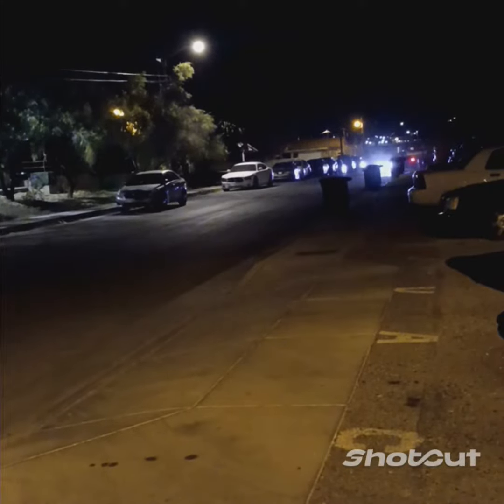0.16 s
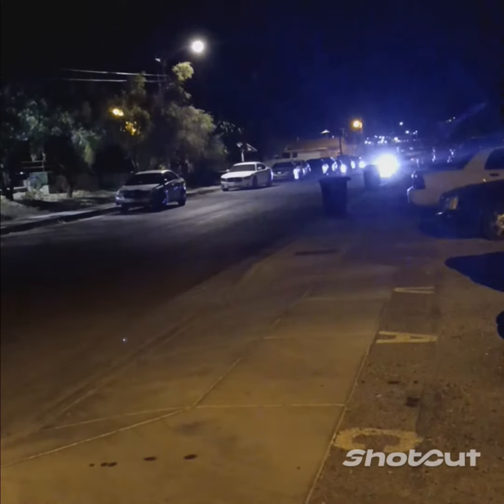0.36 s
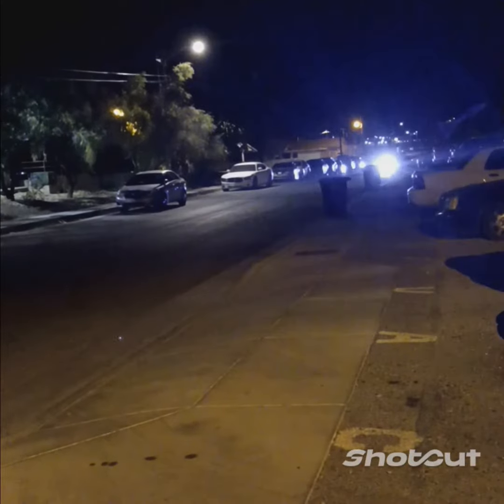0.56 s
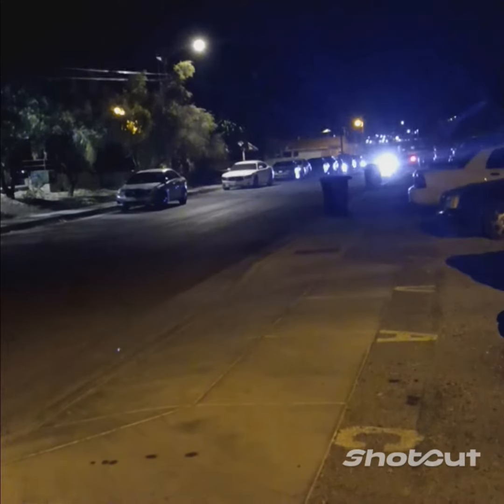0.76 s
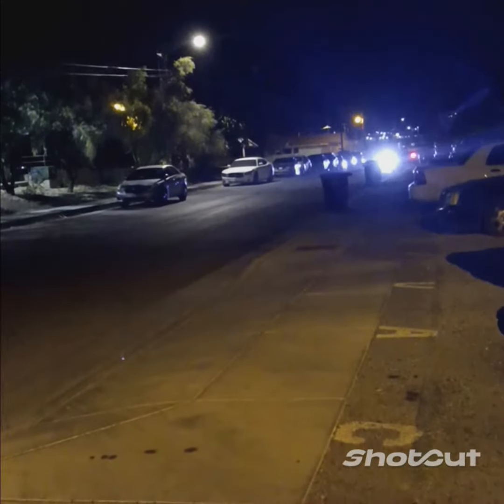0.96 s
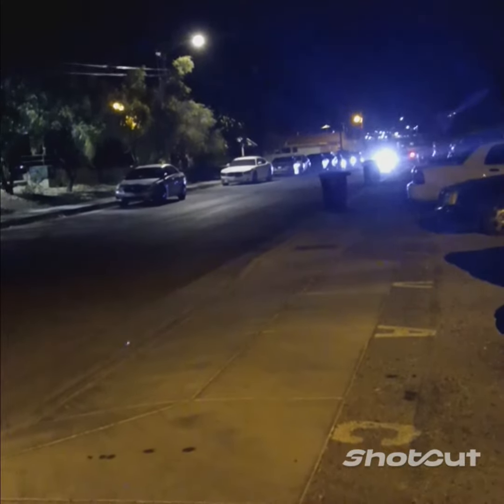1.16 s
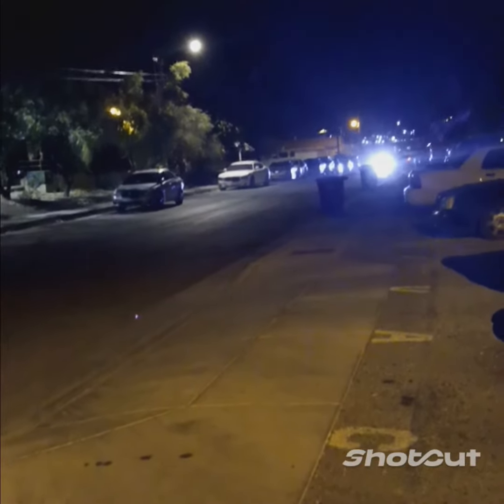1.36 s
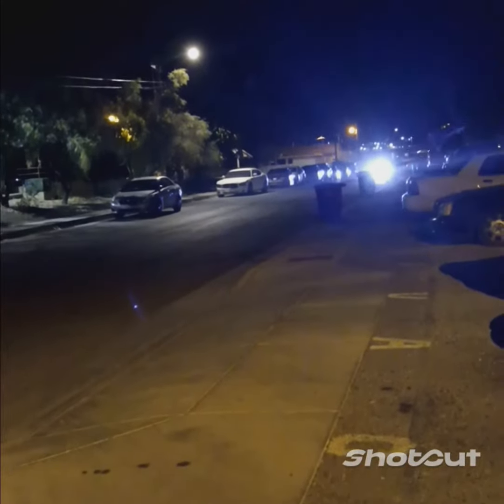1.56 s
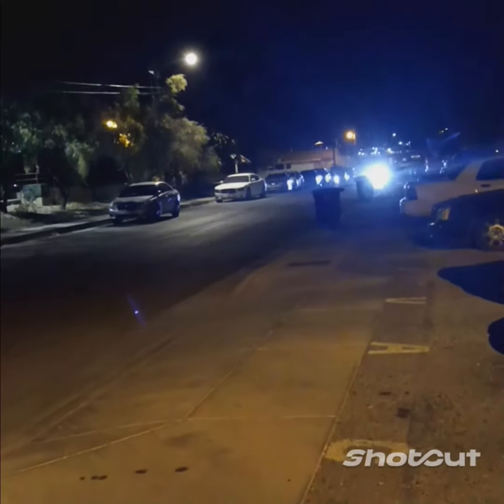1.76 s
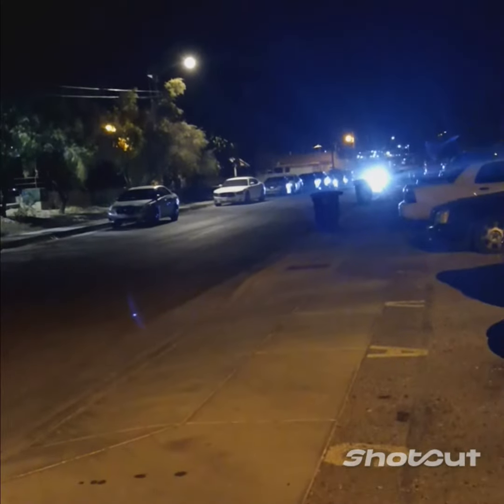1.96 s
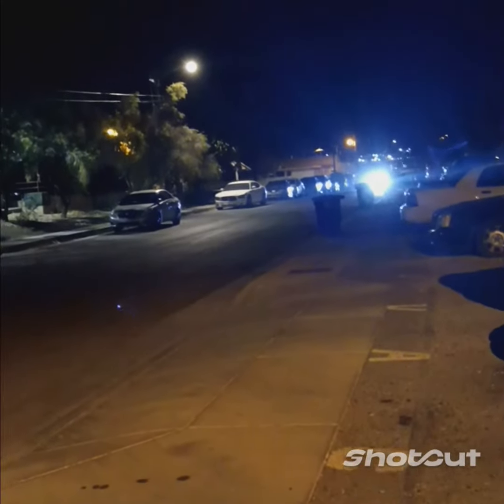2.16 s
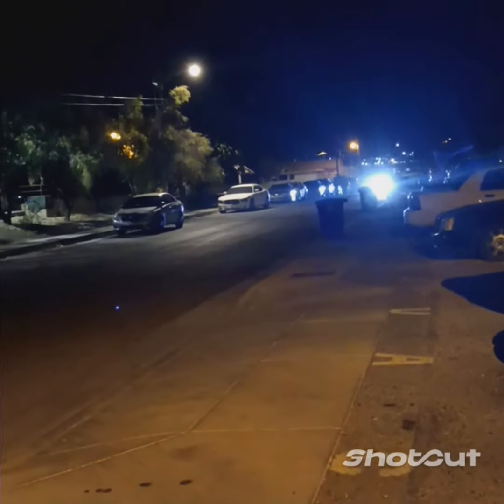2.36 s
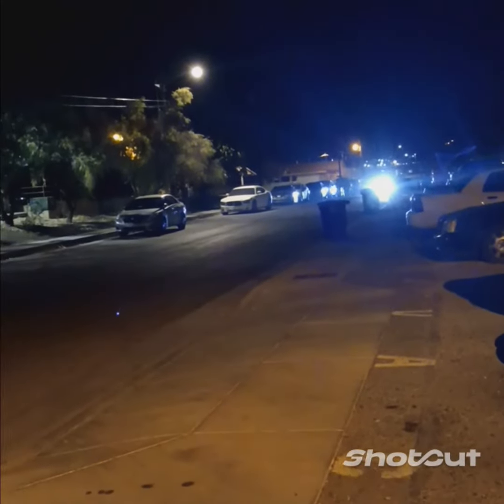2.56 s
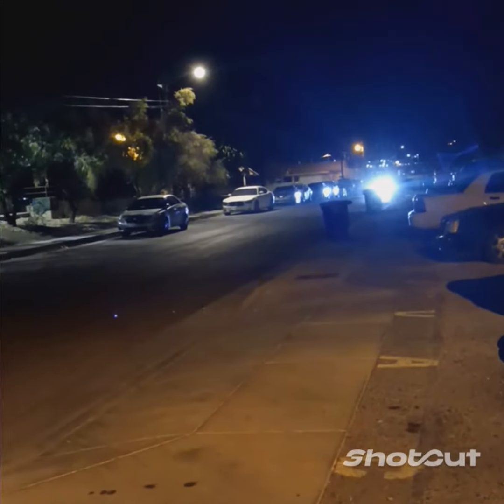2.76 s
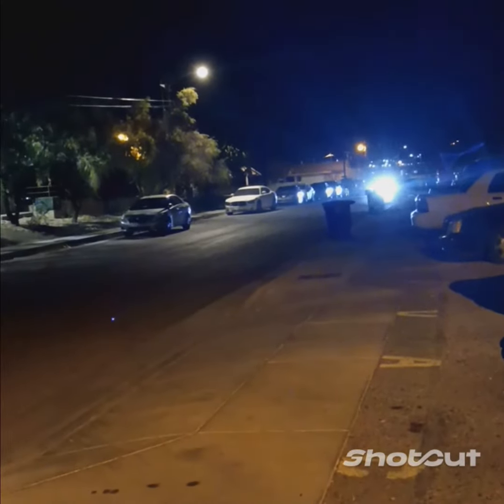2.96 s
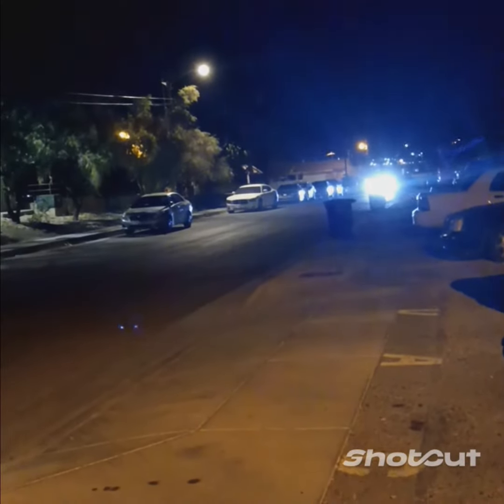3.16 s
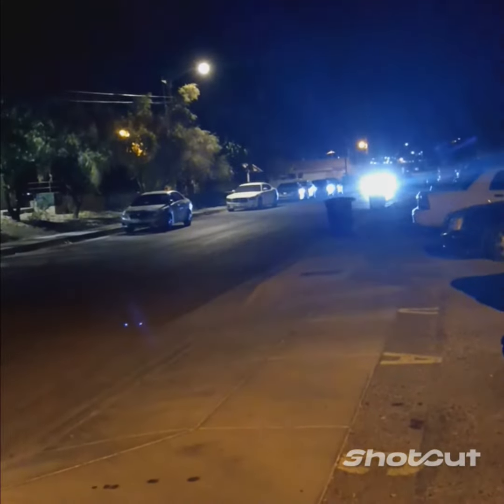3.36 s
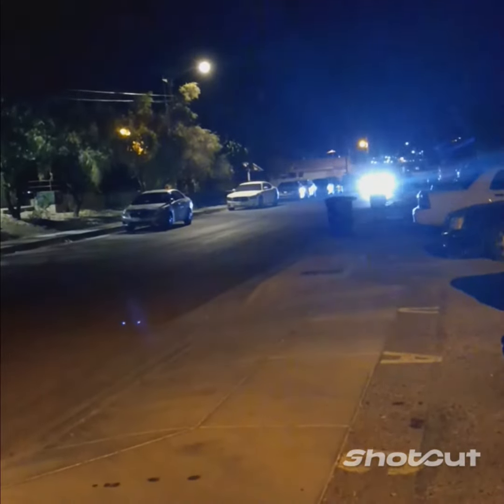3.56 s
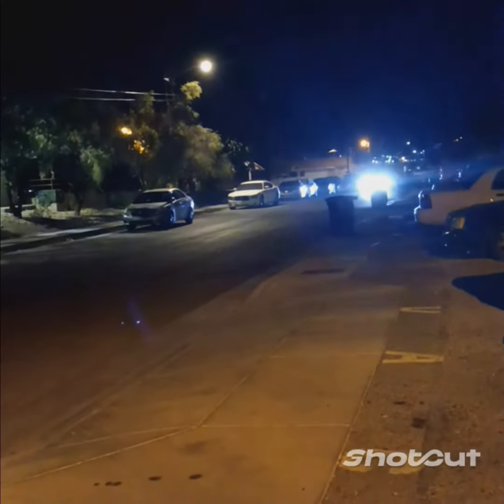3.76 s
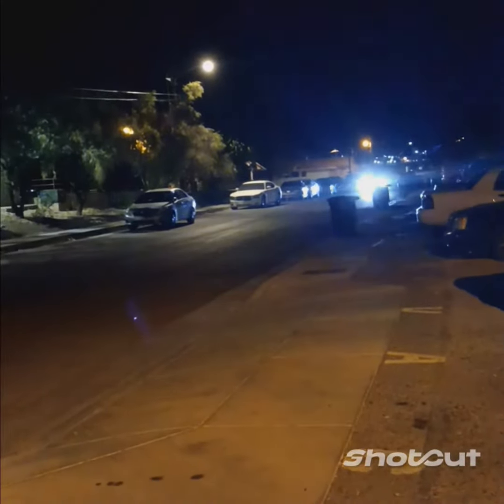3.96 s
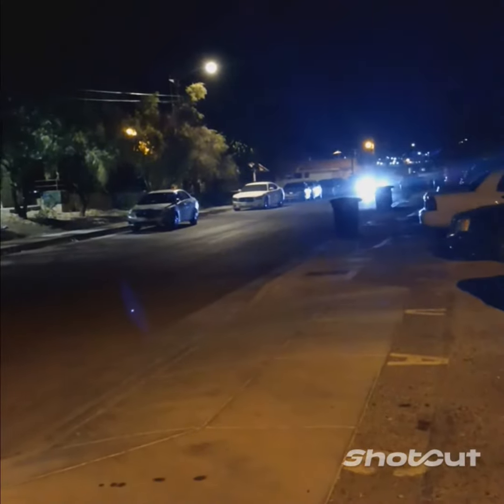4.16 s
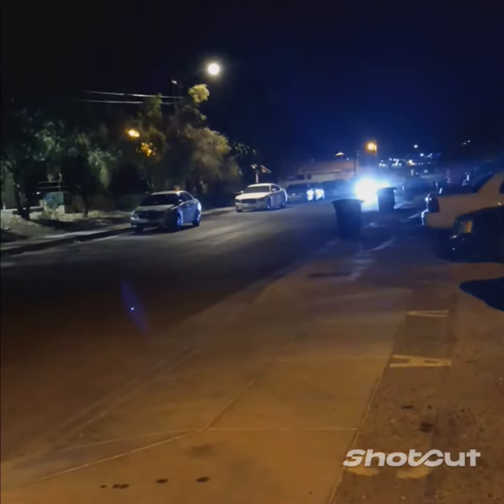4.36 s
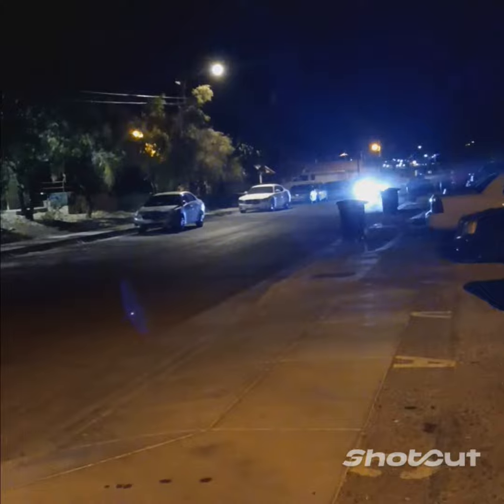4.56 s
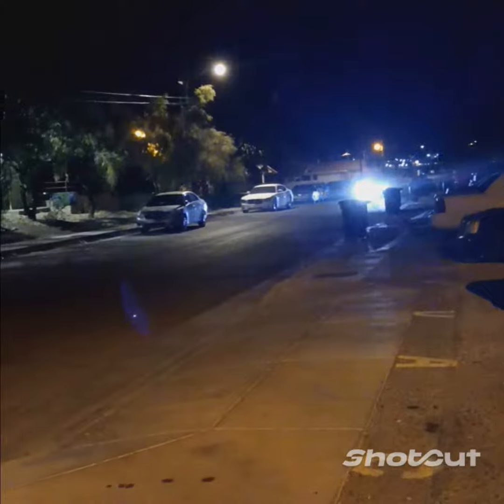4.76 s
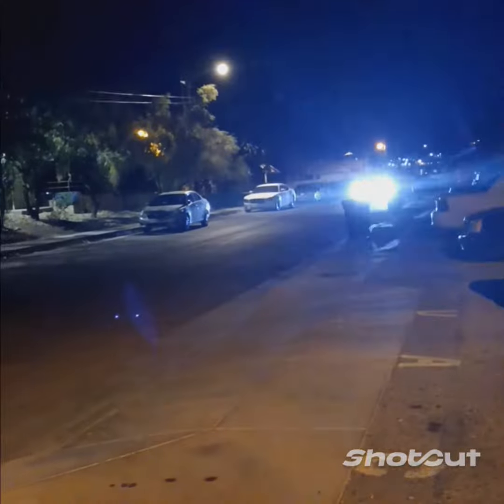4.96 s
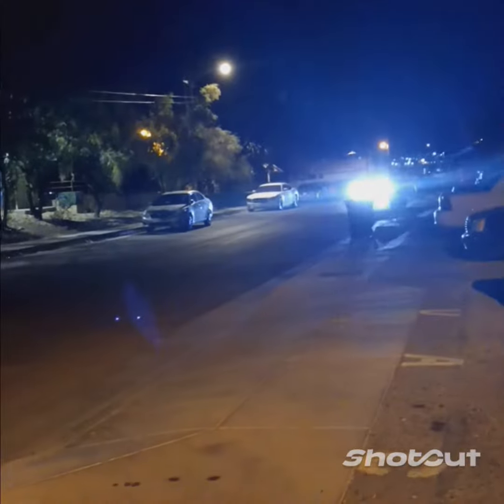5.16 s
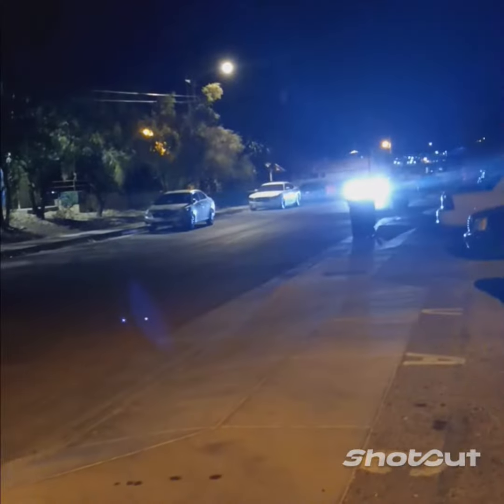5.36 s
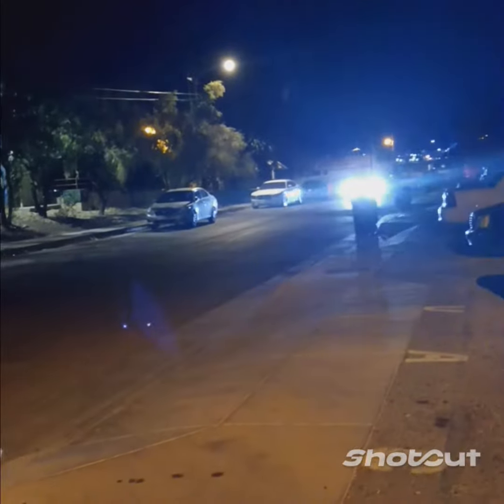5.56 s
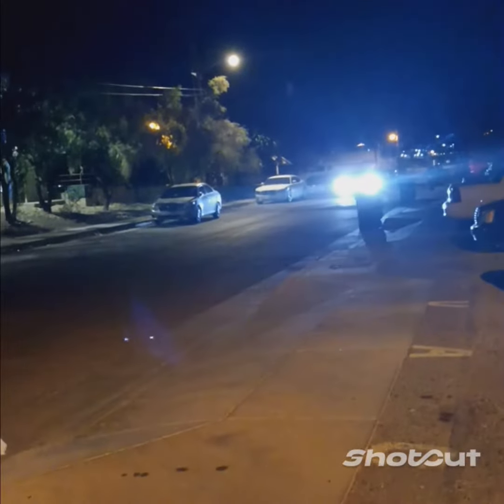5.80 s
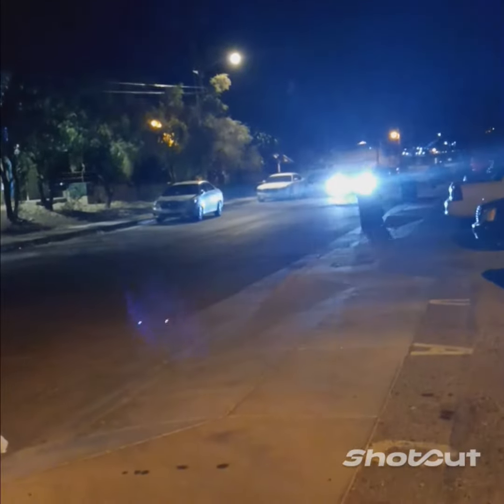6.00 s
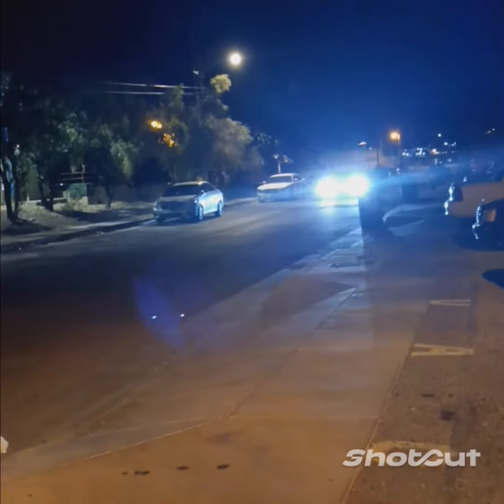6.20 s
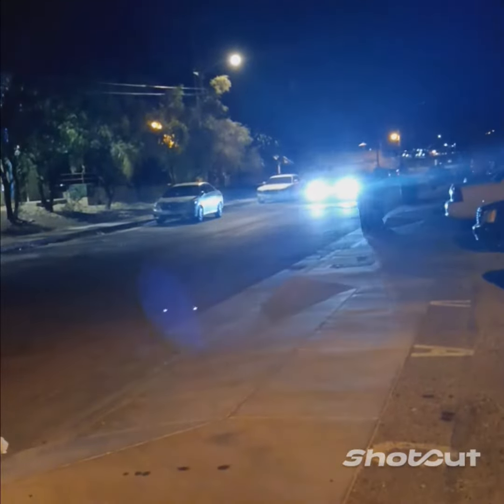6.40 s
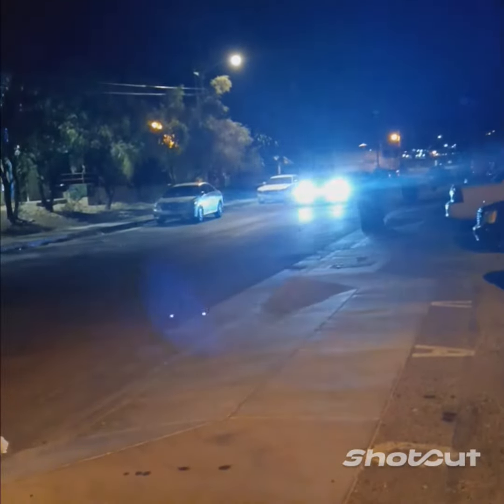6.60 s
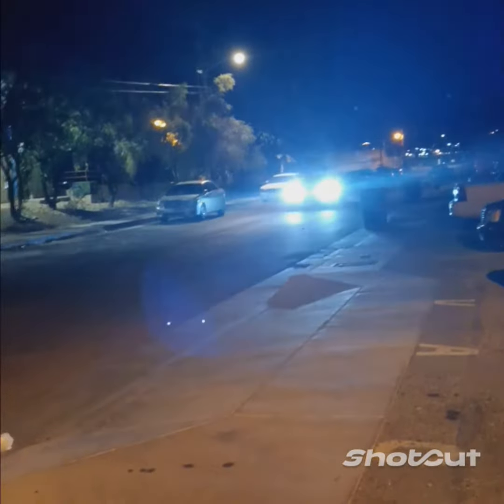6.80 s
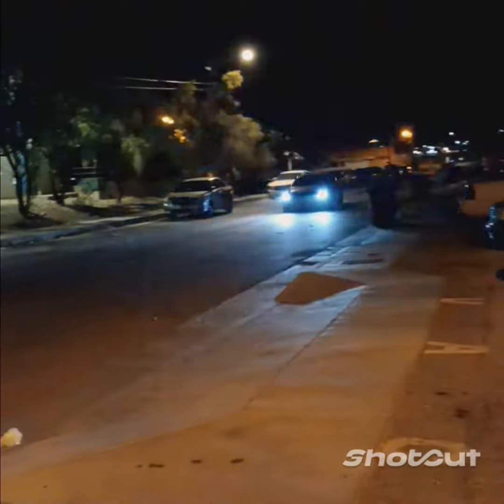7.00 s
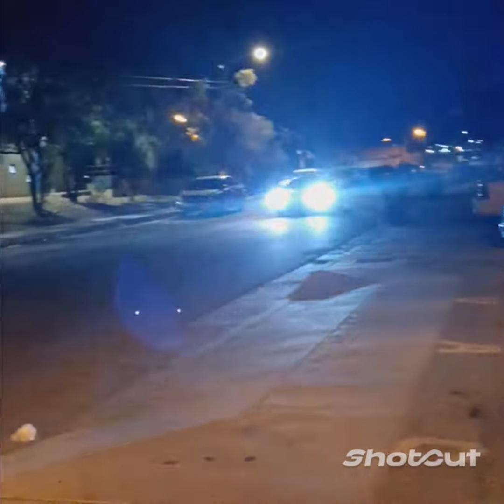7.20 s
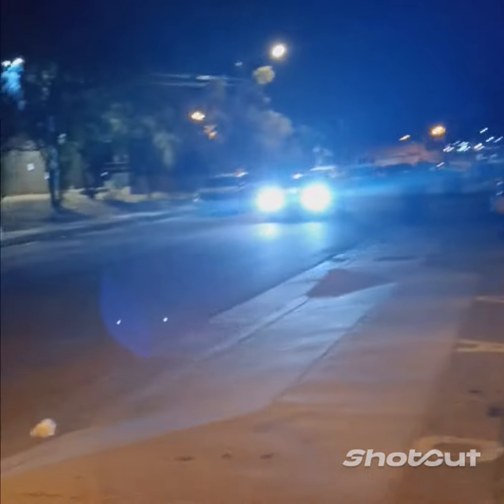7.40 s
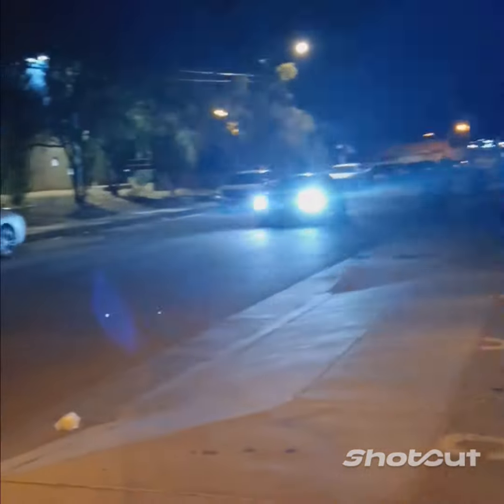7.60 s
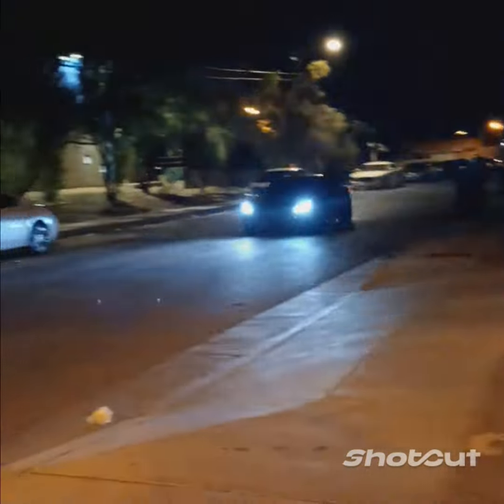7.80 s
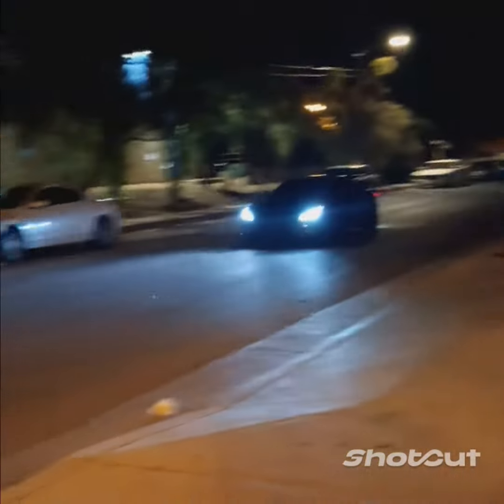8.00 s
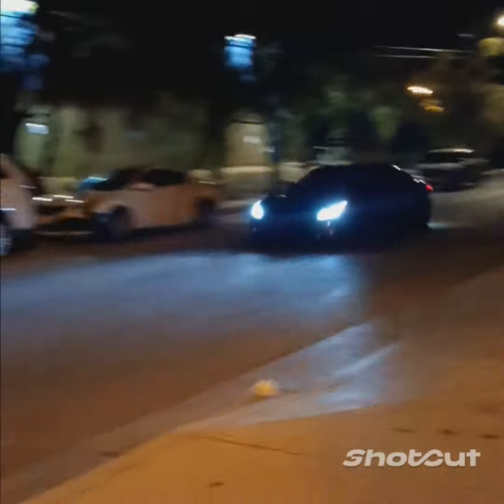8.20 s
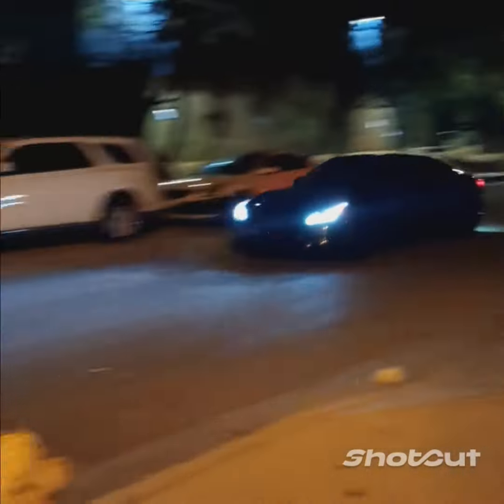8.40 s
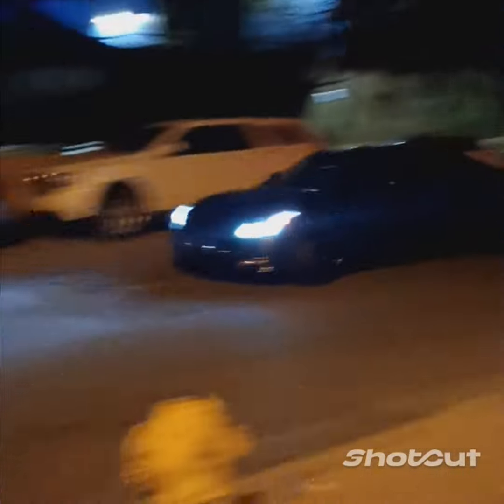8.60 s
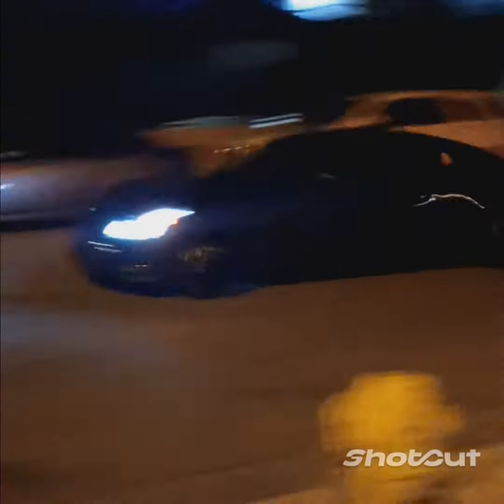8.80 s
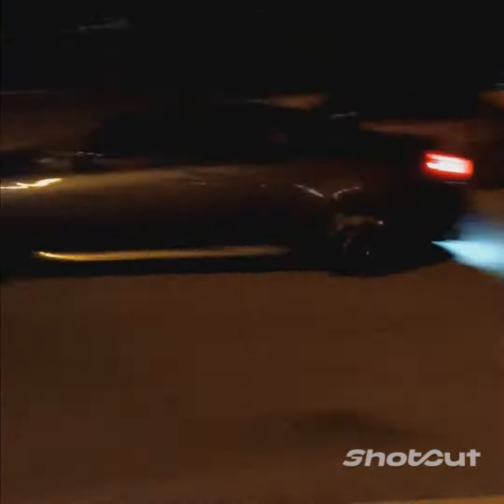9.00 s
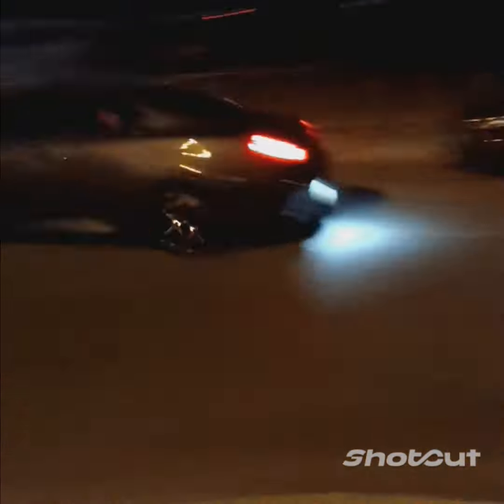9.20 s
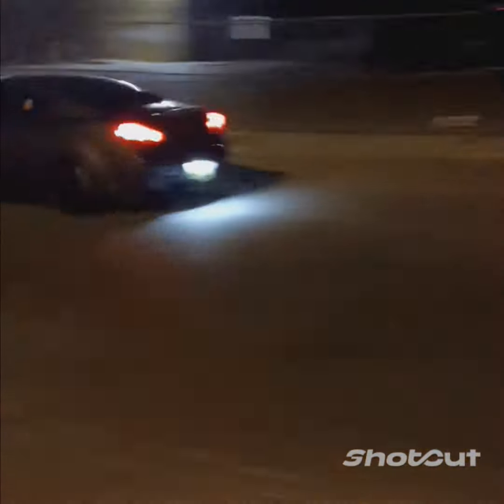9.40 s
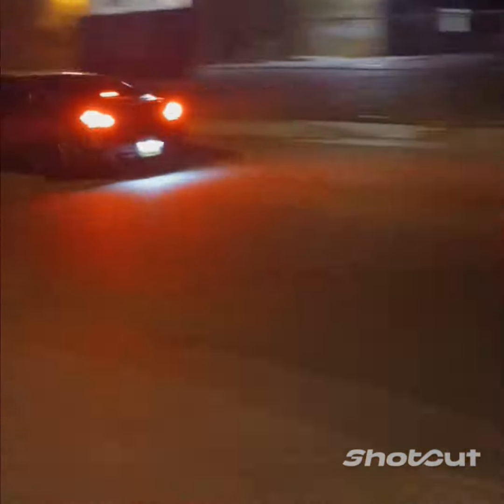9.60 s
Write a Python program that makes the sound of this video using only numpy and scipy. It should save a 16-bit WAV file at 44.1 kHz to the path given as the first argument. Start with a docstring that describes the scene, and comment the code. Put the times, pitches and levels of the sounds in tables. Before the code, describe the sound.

A far-off car winds up through two rising pulls, its exhaust snarling and crackling between house fronts above a low rumble. The revs sink away with a few muffled pops and a thin brake squeak. The engine opens up again and swells into a hissing roar that distorts as it passes right by the microphone, then the throttle shuts and the turbo chuffs rapidly.

```python
"""A six-cylinder car with a straight-pipe exhaust comes up a quiet street at night: it pulls far away,
coasts, pulls again, kicks down and roars past, then lifts off with a flutter of its turbo.
Periodic blowdown pulses excite the pipe's resonances, and the turbulent outflow hisses. Off the
throttle the turbo whistles down, unburnt fuel pops and the brakes squeak. House fronts reflect the
exhaust over a low street rumble, and the pass overloads the microphone."""
import sys
import numpy as np
from scipy import signal
from scipy.fft import rfft, irfft, next_fast_len
from scipy.io import wavfile
from scipy.ndimage import uniform_filter1d, map_coordinates

SR = 44100
rng = np.random.default_rng(int(sys.argv[2]) if len(sys.argv) > 2 else 0)


def digitize_waveform(pressure):
    """Quantize a signal to 16-bit integers and store it at the path in sys.argv[1].

    Rows of a 2-D input are taken as channels; values are limited to [-1, 1].
    """
    field = np.atleast_2d(pressure).T
    bounded = np.clip(field, -1, 1)
    quanta = np.round(bounded * 32767).astype(np.int16)
    wavfile.write(sys.argv[1], SR, quanta)


N = 425565
TIME = np.arange(N) / SR


def amp(db):
    """Amplitude ratio of a level in decibels."""
    return 10 ** (np.asarray(db) / 20)


def unit(x):
    """Normalisation to rms 1."""
    return x / np.sqrt(np.mean(x ** 2) + 1e-20)


def along(points, hz):
    """Interpolation of (f/Hz, value) points on a logarithmic frequency axis."""
    f, v = np.transpose(points)
    return np.interp(np.log(hz + 1), np.log(f + 1), v)


def curve(points):
    """Linear interpolation of (t/s, value) points at every sample."""
    return np.interp(TIME, *np.transpose(points))


def humps(rows, t):
    """One Hann window for each row (centre t/s, duration/s, ...)."""
    centre, length = np.transpose(rows)[:2, :, None]
    return np.cos(np.pi * np.clip((t - centre) / length, -1 / 2, 1 / 2)) ** 2


def wobble(rate):
    """Smooth random modulation: a spline through `rate` Gaussian knots a second."""
    coarse = np.linspace(0, N, int(8 * N * rate / SR) + 2)
    knots = rng.standard_normal(int(N * rate / SR) + 4)
    return np.interp(np.arange(N), coarse, map_coordinates(knots, [coarse * rate / SR]))


def filtered(x, response):
    """Linear filtering: the spectrum of x times a complex frequency response."""
    m = next_fast_len(N + SR // 2)
    return irfft(rfft(x, m) * response(np.fft.rfftfreq(m, 1 / SR)), m)[..., :N]


def coloured(x, spectrum):
    """Minimum-phase filtering by (f/Hz, gain/dB) points, normalised to rms 1."""
    size = 8192
    cepstrum = irfft(np.log(amp(along(spectrum, np.fft.rfftfreq(size, 1 / SR)))))
    cepstrum[1:size // 2] *= 2
    cepstrum[size // 2 + 1:] = 0
    ring = irfft(np.exp(rfft(cepstrum)))
    return unit(signal.fftconvolve(np.atleast_2d(x), ring[None], axes=1)[:, :N])


# Likeness of left and right: f/Hz, coherence
COHERENCE = [(200, 0.95), (600, 0.73), (2000, 0.28), (2800, .4), (9000, 0.29)]
def air():
    """Partially coherent stereo white noise, most alike in the bass."""
    turn = lambda hz: np.arccos(np.clip(along(COHERENCE, hz), -1, 1)) / 2
    white = rng.standard_normal((2, N))
    mid, side = filtered(white, lambda hz: np.array([np.cos(turn(hz)), np.sin(turn(hz))]))
    return np.array([mid + side, mid - side])


# Engine speed as heard: t/s, firing f/Hz
FIRING_RATE = [(0, 83.6), (0.27, 90.7), (.6, 115.1), (0.87, 147.3), (1.33, 171.6), (1.58, 148.3), (2, 162),
               (2.5, 191.5), (3.35, 231.5), (3.9, 269.6), (4.2, 246.9), (5, 149.6), (5.6, 96.34),
               (6.04, 82.43), (6.25, 122.2), (6.38, 134.1), (6.6, 145.8), (7.62, 161.8), (7.77, 193.6),
               (8.25, 202.4), (8.68, 208.8), (8.88, 183.1), (9.35, 177), (9.65, 166)]
def firing_count(unsteady):
    """Phase is the integral of frequency: firings elapsed as the crank turns slightly unevenly."""
    rate = uniform_filter1d(curve(FIRING_RATE), size=2000)
    return np.cumsum(rate * (1 + unsteady * wobble(45))) / SR


# A pull, coasting, a second pull, the lift: t/s, effort (0-1)
ENGINE_EFFORT = [(.5, 0), (0.535, 0.17), (0.69, 0.47), (.77, 0.64), (0.88, 0.79), (1.6, 0.86), (1.89, 0.99),
                 (4.02, 0.99), (4.19, 0.34), (6.16, 0.28), (6.29, 0.57), (6.46, 0.95), (8.76, 0.87),
                 (8.93, 0.22)]
COAST_EFFORT = 0.34
def throttle():
    """Engine load: 0 when coasting, 1 at full effort."""
    return np.clip((curve(ENGINE_EFFORT) - COAST_EFFORT) / (1 - COAST_EFFORT), 0, 1)


PASS_S, CAR_M_PER_S, CLOSEST_M = 8.9, 14.32, 3
POSITION_M = CAR_M_PER_S * (TIME - PASS_S)
DISTANCE_M = np.hypot(POSITION_M, CLOSEST_M)
REMOTENESS = DISTANCE_M / (DISTANCE_M + 50)
def level(base_db, slack_db, near_db, speed_db, behind_db, full_effort=1):
    """Spreading and directivity: level/dB, base_db at full effort, 150 Hz and 30 m before the pass."""
    slack = 1 - np.minimum(curve(ENGINE_EFFORT) / full_effort, 1)
    decades_nearer = np.log10(30 / DISTANCE_M)
    octaves_faster = np.log2(curve(FIRING_RATE) / 150)
    behind = np.clip(POSITION_M / 2.2, 0, 1)  # 2.2 m past, the tailpipe faces the microphone
    source_db = base_db - slack_db * slack + speed_db * octaves_faster
    return source_db + near_db * decades_nearer + behind_db * behind


def order_line(count, multiple, shake_db):
    """Amplitude modulation: one multiple of the firing rate, shaken by uneven combustion, at rms 1."""
    return unit(np.sin(2 * np.pi * (multiple * count + rng.random())) * amp(shake_db * wobble(14)))


# Pipe response to the firing tone: f/Hz, gain/dB
FUNDAMENTAL_RESPONSE = [(85, -8.5), (135, -1.5), (190, -3.5), (215, -0.5), (270, -8)]
def boom_level():
    """Resonance: the level/dB of the firing tone rises as it sweeps through the pipe's peaks."""
    law_db = level(-10, slack_db=17, near_db=15.5, speed_db=-3, behind_db=0.5, full_effort=0.51)
    return law_db + along(FUNDAMENTAL_RESPONSE, curve(FIRING_RATE))


# Exhaust flares and sags: centre t/s, duration/s, then gain/dB of hiss, octave, rasp, crackle
EXHAUST_FLARES = [(0.558, .14, -3, -6, 10.5, -1), (.65, 1.04, 3, -8, -0.5, -2), (1.998, 1, 6.5, 0.5, 3, 3),
                  (3.14, 0.85, 2.5, -14, 4.5, 2), (3.943, 0.59, 2, 4, -3, 1),
                  (4.776, 0.34, -3, -8.5, -3.5, 1), (5.14, 0.3, -3.5, 7, 1, -6),
                  (5.474, 0.24, 1, -4, 2.5, 2), (6.32, 0.17, 1.5, 2.5, 1, -17),
                  (6.962, 0.26, 8, -2, 0.5, 4.5), (7.42, 0.93, 1.5, 1.5, 0, 5),
                  (7.841, 0.62, -1.5, -11.5, -1.5, -4.5), (8.568, 0.6, 1.5, -5, 3.5, -0.5)]
def flare_db(layer):
    """Slow amplitude modulation: the gain/dB that the flares give one layer."""
    column = 2 + ["hiss", "octave", "rasp", "crackle"].index(layer)
    t = TIME[::100]
    return np.interp(TIME, t, np.transpose(EXHAUST_FLARES)[column] @ humps(EXHAUST_FLARES, t))


# Lines of a once-a-turn imbalance: multiple of the crank speed, relative level/dB
CRANK_ORDERS = [(2, -15), (4, 0), (5, -14), (9, -14), (10, -21), (11, -20), (12, -22), (15, -26), (18, -28)]
# Swells and dips of the firing tone: t/s, gain/dB
BOOM_SWELL = [(.38, 1.5), (.49, 11.5), (.65, -0.5), (.9, 0), (1.35, 1), (1.45, 1.5), (2.7, 6), (3.4, -3.5),
              (3.72, 4), (4.13, 4), (4.22, 0), (4.55, -9.5), (4.84, 1.5), (5.18, 3.5), (5.3, -5),
              (6.05, 0.5), (6.15, 11), (6.22, -3), (6.32, 8.5), (6.47, 0), (7.02, 1.5), (7.19, -6),
              (7.24, 2.5), (7.53, 0), (7.93, 2.5), (8.02, -7.5), (8.09, 4.5), (8.3, -3), (8.7, 2), (8.8, 1),
              (8.92, 4.5), (9.02, -5.5), (9.08, 2)]
# Pipe response to harmonics 2 and 3: f/Hz, gain/dB
HARMONIC_RESPONSE = [(170, -1.5), (215, 6), (255, -4.5), (320, -6.5), (380, -7), (430, -14.5), (540, -29)]
def drone(count, fading_db):
    """Periodic firing gives a harmonic series; unequal cylinders add lines between the harmonics."""
    ragged_db = 3.5 - .8 * throttle()
    line = lambda multiple: order_line(count, multiple, ragged_db)
    banks = unit(sum(amp(db) * line(k + 1 / 2) for k, db in enumerate([-3, 0, -8])))
    banks *= amp(level(-36.5, slack_db=17.5, near_db=17, speed_db=10.5, behind_db=7.5))
    firings_per_turn = len(FIRING_ORDER) / 2
    crank = unit(sum(amp(db) * line(k / firings_per_turn) for k, db in CRANK_ORDERS))
    crank *= amp(level(-45.5, slack_db=-7, near_db=10.5, speed_db=4.5, behind_db=16.5))
    waver_db = fading_db * REMOTENESS * (2 - throttle()) * wobble(14) + .7 * wobble(60)
    firing = amp(boom_level() + curve(BOOM_SWELL) + waver_db) * order_line(count, 1, shake_db=.2)
    harmonic = lambda k: amp(along(HARMONIC_RESPONSE, k * curve(FIRING_RATE))) * line(k)
    upper_db = level(-11, slack_db=26, near_db=10.5, speed_db=-8.5, behind_db=9.5) + flare_db("octave")
    upper = amp(upper_db) * (harmonic(2) + amp(-5.5) * harmonic(3))
    ease_in = np.minimum(TIME / .01, 1)
    return ease_in * (firing + upper + banks + crank)


# Flattening of the echo from behind the car: t/s, fraction of the frequency lost
ECHO_SHIFT = [(.9, 0), (1.8, .022), (2.45, .058), (3.9, .066), (6.4, .05)]
def both_ways(source, count, echo_share):
    """Doppler shift: the tailpipe points backwards, so a flattened echo joins the direct sound."""
    echo_count = np.cumsum(np.gradient(count) * (1 - curve(ECHO_SHIFT)))
    share = echo_share * DISTANCE_M ** 2 / (DISTANCE_M ** 2 + 28 ** 2)
    return np.sqrt(1 - share) * source(count) + np.sqrt(share) * source(echo_count)


# Reflections off house fronts: initial delay/s, growth of the delay/(s/s), relative gain
REFLECTIONS = [(.02484, .00055, .28), (.09663, .00596, .24), (.03626, .00901, .2)]
def house_fronts(x):
    """Interference: reflections meet the direct sound, so a gliding tone swells and fades."""
    echoes = sum(gain * np.interp(TIME - delay - growth * TIME, TIME, x)
                 for delay, growth, gain in REFLECTIONS)
    return x + echoes * DISTANCE_M / (DISTANCE_M + 16.3)


# Reverberation time of the street: f/Hz, T60/s
STREET_T60 = [(150, 0.96), (1000, 0.87), (4000, 0.45), (12000, 0.16)]
def street(x, share, wall_s, wall_db, tail_db):
    """Reverberation: one slap from a house front and a diffuse tail, both scaled by share."""
    hz, t, noise = signal.stft(air()[:, :SR], SR, nperseg=256)
    tail = signal.istft(noise * amp(-60 * t / along(STREET_T60, hz)[:, None]), SR, nperseg=256)[1]
    x = np.atleast_2d(x)
    diffuse = signal.fftconvolve(x, tail / np.linalg.norm(tail[0]), axes=1)[:, :N]
    slap = filtered(x, lambda hz: np.exp(-2j * np.pi * hz * wall_s))
    total = np.sqrt(1 + share ** 2 * (amp(wall_db) ** 2 + amp(tail_db) ** 2))
    return (x + share * (amp(wall_db) * slap + amp(tail_db) * diffuse)) / total


# Course of the street rumble: t/s, relative level/dB
RUMBLE_COURSE = [(0.0, -45), (3.1, -48.5), (3.6, -43.5), (5.13, -42.5), (6.2, -42.5), (6.8, -46),
                 (8.0, -57.5), (8.74, -45.5), (8.92, -55), (9.5, -45), (9.65, -31.5)]
# An engine idling in the street: nominal f/Hz, level/dB re the rumble
IDLE_LINES = [(43, -13), (64, -9)]
# Spectrum of the rumble: f/Hz, relative level/dB
RUMBLE_SPECTRUM = [(15, -24.5), (33, -5.5), (43, -12), (52, -17.5), (70, -8), (120, -2.5), (200, -9),
                   (400, -18.5), (1000, -32), (1500, -43), (3000, -88)]
# Spectrum of the eddies: f/Hz, relative level/dB
EDDY_SPECTRUM = [(20, -57.5), (50, -22.5), (90, -5.5), (150, 18.5), (250, 5.5), (400, -10), (800, -68)]
def road(gain_db):
    """Superposition of street rumble, an idling engine and eddies that follow the exhaust's strength."""
    idle = sum(amp(db) * order_line(hz * TIME + 0.12 * wobble(7.7), 0.98, shake_db=-5)
               for hz, db in IDLE_LINES)
    eddies = amp(0.59 * boom_level() - 21) * coloured(air(), EDDY_SPECTRUM)
    return amp(curve(RUMBLE_COURSE) + gain_db) * (coloured(air(), RUMBLE_SPECTRUM) + idle) + eddies


# The cylinders in turn: relative strength, lateness/firing intervals
FIRING_ORDER = [(0.79, 0.016), (0.75, 0.036), (0.99, 0.0049), (0.64, 0.024), (1.18, 0.00054), (1.12, 0.029)]
def blowdowns(count, jitter, scatter_db):
    """Impulse train: one pulse per opening exhaust valve, each with its own strength and timing."""
    k = np.arange(1, int(count[-1]))
    strength, late = np.array(FIRING_ORDER)[k % len(FIRING_ORDER)].T
    chance = rng.standard_normal((len(k), 2))
    at = np.interp(k + late + jitter * chance[:, 0], count, np.arange(N))
    size = strength * amp(scatter_db * chance[:, 1])
    size *= np.sqrt(np.abs(np.gradient(at)))  # equal power at any firing rate
    whole, part = at.astype(int), at % 1
    pulses = np.bincount(whole, size * (1 - part), N + 1) + np.bincount(whole + 1, size * part, N + 1)
    return pulses[:N]


# Spectrum of the coasting exhaust: f/Hz, relative level/dB
OVERRUN_SPECTRUM = [(60, -39.5), (110, -23), (150, -6), (260, 2), (310, -10.5), (420, -22), (530, -13),
                    (1200, -33.5), (2500, -55.5)]
def overrun(count):
    """Timing jitter smears harmonics: with the throttle shut, ragged firing makes a low flutter."""
    thumps = coloured(blowdowns(count, jitter=.3, scatter_db=5), OVERRUN_SPECTRUM)
    thump_db = level(-49.5, slack_db=-3, near_db=2, speed_db=7, behind_db=21.5)
    return amp(thump_db) * (1 - throttle()) * thumps


def puffs(count, depth):
    """Amplitude modulation: noise that swells once per firing."""
    return unit(air() * np.exp(depth * np.cos(2 * np.pi * count)))


# Spectrum of the ringing pipe: f/Hz, relative level/dB
PIPE_SPECTRUM = [(60, -79.5), (150, -55.5), (290, -2.5), (420, 1.5), (490, 4), (550, -2), (640, 4.5),
                 (810, 0), (920, -4.5), (1030, -5.5), (1300, -7.5), (1600, -10.5), (2080, -13),
                 (2300, -32.5), (2700, -19.5), (4500, -78)]
# Spectrum of a mid-range rush, probably the tyres: f/Hz, relative level/dB
RUSH_SPECTRUM = [(200, -10), (330, 2), (420, -1.5), (530, 1.5), (700, 2.5), (950, 1), (1200, -2),
                 (1600, -6.5), (1850, -8.5), (2060, -3.5), (2280, -18.5), (2600, -64), (4000, -66)]
def rasp(count):
    """Impulse excitation: pulses ring the pipe; a wavering rush is heard mostly while the car coasts."""
    load = throttle()
    pulses = both_ways(lambda c: blowdowns(c, jitter=0.004, scatter_db=2), count, echo_share=0.76)
    ring = street(coloured(pulses, PIPE_SPECTRUM), np.sqrt(REMOTENESS), wall_s=.05, wall_db=-3, tail_db=3)
    waver_db = 1.2 * (2 - load) * wobble(28)
    rush = coloured(puffs(count, depth=0.11), RUSH_SPECTRUM) * amp(waver_db)
    pulsed = .08 + .82 * load
    blend = np.sqrt(pulsed) * ring + np.sqrt(1 - pulsed) * rush
    # both are faint before the first pull
    lull_db = 17 * (1 - np.minimum(curve(ENGINE_EFFORT) / COAST_EFFORT, 1))
    rasp_db = level(-20, slack_db=24, near_db=14.5, speed_db=-0.05, behind_db=3) + flare_db("rasp")
    return amp(rasp_db - lull_db + 1.5 * wobble(8)) * blend


def far_echo(x, t60, db):
    """Exponential decay: the distant exhaust rolls on down the street without its bass and treble."""
    band = [(500, -28.5), (900, -1), (1500, -4), (2050, 5), (2500, -22.5), (5000, -46)]
    tail = coloured(air(), band)[:, :SR] * amp(-60 * TIME[:SR] / t60)
    return amp(db) * signal.fftconvolve(x * REMOTENESS, tail / np.linalg.norm(tail[0]), axes=1)[:, :N]


# Spectrum of the tailpipe hiss: f/Hz, relative level/dB
JET_SPECTRUM = [(1200, -33), (2000, 2), (2500, 2), (3500, -4), (4300, -3.5), (6300, -2.5), (8000, -4.5),
                (9800, -4), (11500, -12), (15000, -21)]
def jet(count, boost_lag_s):
    """Jet noise: gas leaves the tailpipe with a pulsing hiss; air absorption dulls it at a distance."""
    near = coloured(puffs(count, depth=0.17), JET_SPECTRUM)
    absorption = [(2500, -0.5), (4000, -1.5), (7000, -5), (10300, -6), (12500, -10)]
    far = filtered(near, lambda hz: amp(along(absorption, hz)))
    away = np.clip(DISTANCE_M / 40 - 1 / 2, 0, 1)
    asked_db = level(-31, slack_db=41.5, near_db=20, speed_db=1.5, behind_db=3.5)
    # the hiss waits for the turbo to spool up, but stops at once
    hiss_db = np.minimum(asked_db, np.interp(TIME - boost_lag_s, TIME, asked_db))
    return amp(hiss_db + flare_db("hiss") + 0.73 * wobble(50)) * (away * far + (1 - away) * near)


# Pipe response to the engine orders: f/Hz, gain/dB
SNARL_RESPONSE = [(300, -12), (410, -10.5), (480, -0.5), (550, -5), (640, -6), (760, 3), (880, -4.5),
                  (1020, -1.5), (1150, -5.5), (1400, -2), (1700, -11), (2000, -14), (2300, -23.5),
                  (3000, -26)]
# Passing howls: centre t/s, duration/s, f/Hz, peak gain/dB
HOWL_PEAKS = [(1.978, 0.31, 860, 10.5), (3.15, 0.56, 660.5, -9), (6.323, 0.46, 746, 14.5),
              (7.377, .55, 820, 6), (8.262, 0.63, 920, 10.5), (8.547, 0.91, 1490, 12.5)]
def snarl(count, howl_octaves=0.23, half_order_db=-3, wake_m=5.5):
    """Forced resonance: under load, whole and half orders swell as they sweep the pipe's peaks."""
    at = np.arange(0, N, 100)
    rate = np.gradient(count)[at] * SR
    wake = 1 / (1 + (DISTANCE_M / wake_m) ** 4)  # close by, the wake shakes and weakens the snarl
    shaken = count + (.004 + 0.029 * wake) * wobble(90)
    centre_hz, peak_db = np.transpose(HOWL_PEAKS)[2:, :, None]
    howls_db = peak_db * humps(HOWL_PEAKS, at / SR)
    lines = np.zeros(N)
    for k in np.arange(5, 29) / 2:
        in_tune = np.exp(-(np.log2(k * rate / centre_hz) / howl_octaves) ** 2 / 2)
        pipe_db = along(SNARL_RESPONSE, k * rate) + np.sum(howls_db * in_tune, axis=0)
        shake_db = 2.8 * wobble(24)[at]
        gain = amp(pipe_db + half_order_db * (k % 1 > 0) + shake_db)
        lines += np.interp(np.arange(N), at, gain) * np.sin(2 * np.pi * (k * shaken + rng.random()))
    # the cylinders take turns, so every line has sidebands
    cycle = 2 * np.pi * count / len(FIRING_ORDER)
    lope = 1 + .35 * np.cos(cycle) + .3 * np.sin(2 * cycle)
    snarl_db = level(-33.5, slack_db=2.5, near_db=11, speed_db=8.5, behind_db=3) - 4 * wake
    return amp(snarl_db) * throttle() * lope * lines


# Spectrum of an exhaust crack: f/Hz, relative level/dB
CRACK_SPECTRUM = [(700, -28), (1400, 5.5), (1800, 8), (2500, 3), (4400, -1), (5300, -13), (6000, -24),
                  (10500, -20.5), (13000, -42.5)]
def crackle(count):
    """Short pulses are broadband: on an open throttle each blowdown leaves with a sharp, uneven crack."""
    pulses = both_ways(lambda c: blowdowns(c, jitter=0.022, scatter_db=1), count, echo_share=0.77)
    cracks = street(coloured(pulses, CRACK_SPECTRUM), 1, wall_s=.045, wall_db=-3, tail_db=5)
    crack_db = level(-41.5, slack_db=62.5, near_db=13.5, speed_db=2.5, behind_db=-12, full_effort=0.75)
    return amp(crack_db + flare_db("crackle")) * cracks


# Thin ticks during the first pull: t/s, level/dB
TICK_EVENTS = [(2.34, -37.5), (2.353, -34), (2.409, -33.5)]
def ticks(decay_s):
    """Transients: bright noise with a fast exponential decay is heard as a tick."""
    onset, db = np.transpose(TICK_EVENTS)
    age = TIME - onset[:, None]
    bursts = amp(db) @ ((age > 0) * np.exp(-np.abs(age) / decay_s))
    return bursts * coloured(air(), [(4000, -27), (8000, 2), (10000, 6), (15500, -14)])


# Faint high whistles and squeaks: t/s, duration/s, f/Hz, level/dB, relative overtone/dB, fractional waver
HIGH_TONES = [(4.197, 0.43, 3100, -72, -22.5, 0.017), (4.454, 0.11, 4814, -46, -8.5, .012),
              (4.535, 0.087, 4790, -52.5, -22, .007), (5.247, 0.56, 7468, -69.5, -41.5, 0.026)]
def whistles_and_squeaks(sag):
    """Frequency modulation: wavering, sagging tones of the turbo winding down, then of the brakes."""
    out = np.zeros(N)
    for onset, length, hz, db, overtone_db, waver in HIGH_TONES:
        progress = np.clip((TIME - onset) / length, 0, 1)
        pitch_hz = hz * (1 + waver * wobble(700) - sag * (progress - 1 / 3))
        phase = 2 * np.pi * np.cumsum(pitch_hz) / SR
        swell = amp(db + 2 * wobble(51)) * np.abs(np.sin(np.pi * progress ** 0.43))
        out += swell * (np.sin(phase) + amp(overtone_db) * np.sin(2 * phase))
    return street(out, 1, wall_s=.03, wall_db=-9, tail_db=-9)


# Pops off the throttle: t/s, level/dB
POP_EVENTS = [(4.235, -31.5), (5.463, -32), (5.486, -37), (5.865, -42.5), (5.92, -37), (6.06, -37.5),
              (6.205, -34)]
# Spectrum of a pop: f/Hz, relative level/dB
POP_SPECTRUM = [(300, -10), (550, -2), (800, 11), (1200, -3), (2100, -8.5), (2600, -32), (6000, -38),
                (9000, -48), (13000, -69.5)]
def pops(decay_s):
    """Impulsive combustion: unburnt fuel pops softly in the pipe, and the street answers."""
    onset, db = np.transpose(POP_EVENTS)
    age = TIME - onset[:, None]
    bursts = amp(db) @ ((age > 0) * np.exp(-np.clip(age / decay_s, 0, 50)))
    noise = coloured(rng.standard_normal(N), POP_SPECTRUM)
    return street(bursts * noise, 1, wall_s=.035, wall_db=-8, tail_db=-5)


# Turbo surges after the lift: t/s, level/dB
SURGES = [(8.979, -38), (9.088, -35), (9.208, -39.5), (9.324, -37), (9.441, -34.5), (9.561, -35)]
def turbo_flutter(attack_s, decay_s, snap_db, snap_s):
    """Compressor surge: trapped boost coughs back in short chuffs, each opening with a snap."""
    onset, db = np.transpose(SURGES)
    age = np.clip(TIME - onset[:, None], 0, 1 / 2)
    rise = 1 - np.exp(-age / attack_s)
    fall = np.exp(-age / decay_s) + amp(snap_db) * np.exp(-age / snap_s)
    hiss = coloured(air(), [(1200, -13), (3000, 6), (7000, 9.5), (10000, 6.5), (15000, -17.5)])
    return amp(db) @ (rise * fall) * hiss


def scene():
    """Superposition of car and street; the reverberant share grows with the car's distance."""
    count = firing_count(unsteady=0.00328)
    low = both_ways(lambda c: drone(c, fading_db=1.5), count, echo_share=.26)
    low = street(house_fronts(low), REMOTENESS ** 2, wall_s=.26, wall_db=-7, tail_db=-7)
    bark = street(both_ways(snarl, count, echo_share=1), REMOTENESS, wall_s=.06, wall_db=-7, tail_db=-2)
    grit = rasp(count) + crackle(count)
    car = low + bark + grit + far_echo(grit, t60=2.1, db=-13)
    car += jet(count, boost_lag_s=0.027) + overrun(count) + pops(decay_s=0.011) + ticks(decay_s=.002)
    car += turbo_flutter(attack_s=0.00061, decay_s=0.016, snap_db=-4.5, snap_s=0.0024)
    return car + whistles_and_squeaks(sag=.012) + road(gain_db=9.5)


def record(dry, left_lag_s=.00096, low_cut_hz=35, top_hz=15700):
    """Saturation: both channels flatten at full scale and are band-limited; the left is late and dull."""
    tilt = [(5000, 0), (8000, 2), (12000, -11.5)]  # f/Hz, left re right/dB
    left = filtered(dry[0], lambda hz: amp(along(tilt, hz) / 2) * np.exp(-2j * np.pi * hz * left_lag_s))
    right = filtered(dry[1], lambda hz: amp(-along(tilt, hz) / 2))
    pair = np.array([left, right])
    flattened = pair / (1 + np.abs(pair) ** 5) ** (1 / 5)
    return filtered(flattened, lambda hz: (hz < top_hz) * hz ** 4 / (hz ** 4 + low_cut_hz ** 4))


dry = scene()
out = record(dry)
digitize_waveform(out)
```